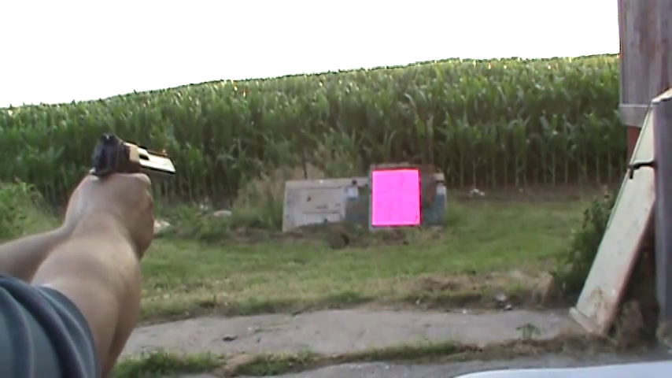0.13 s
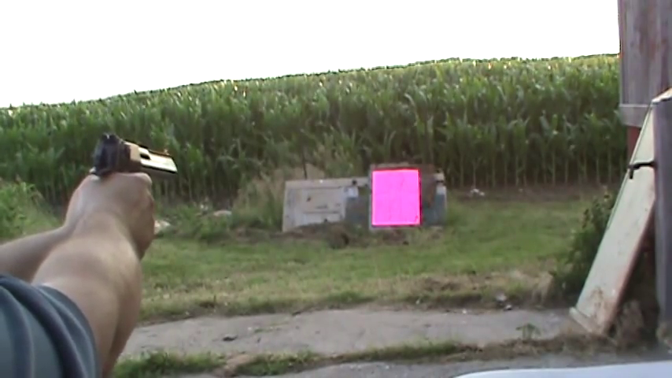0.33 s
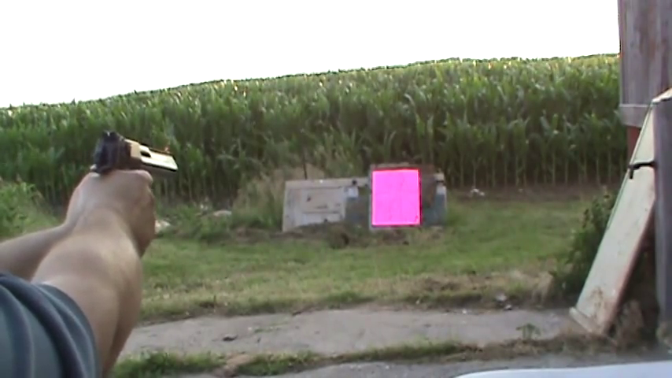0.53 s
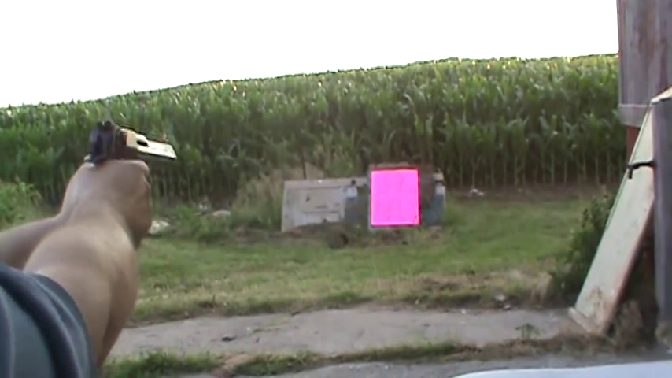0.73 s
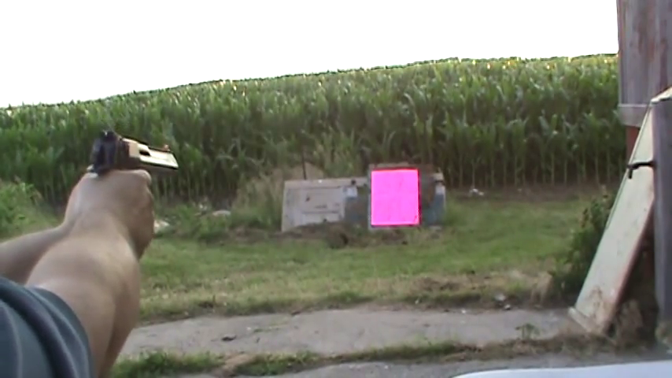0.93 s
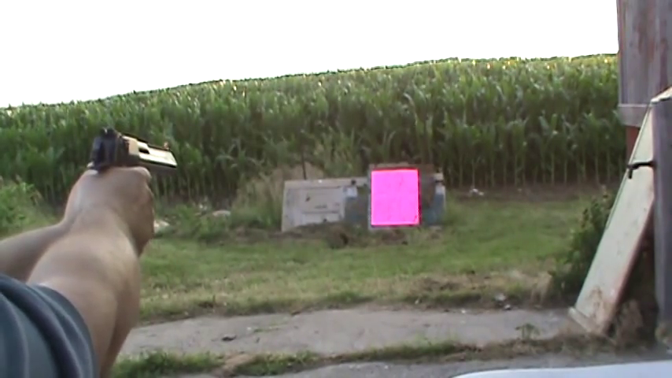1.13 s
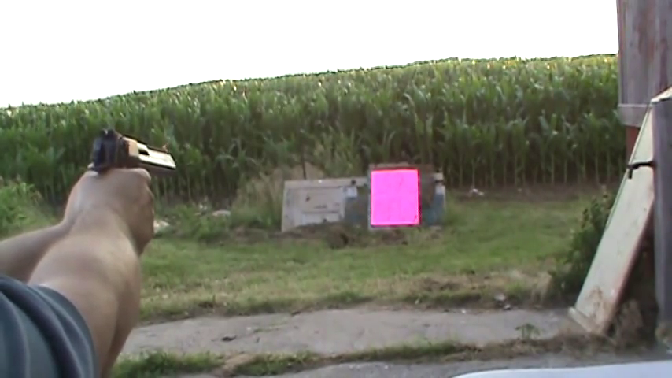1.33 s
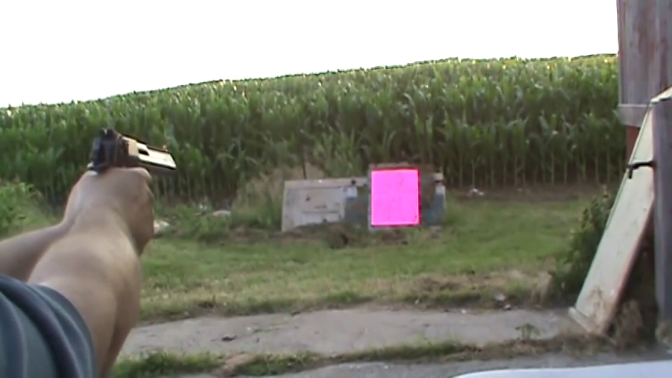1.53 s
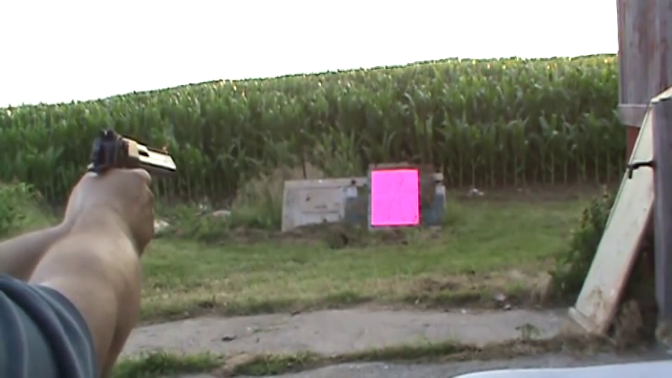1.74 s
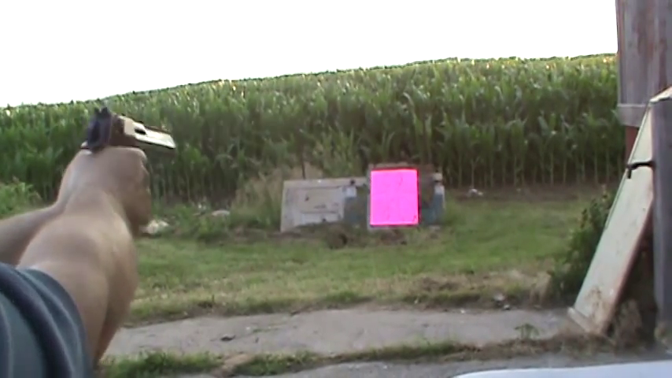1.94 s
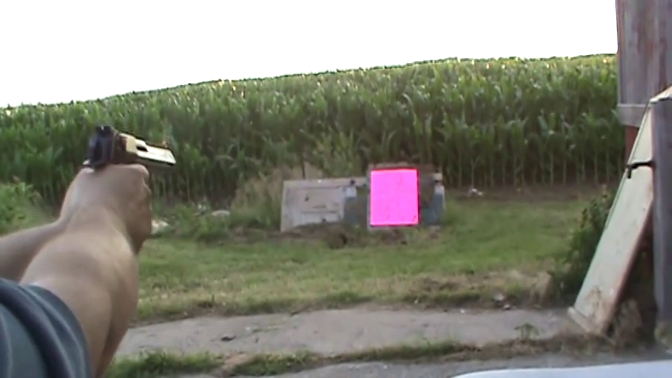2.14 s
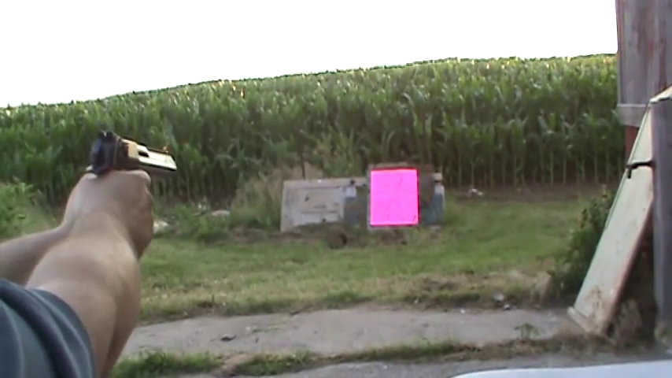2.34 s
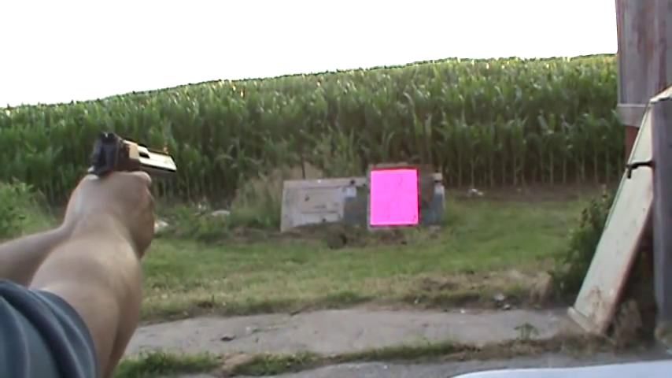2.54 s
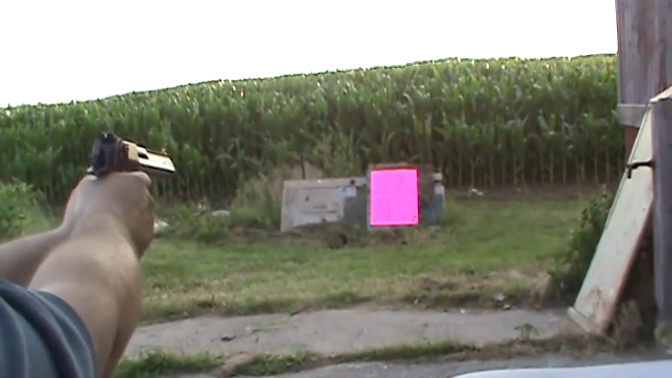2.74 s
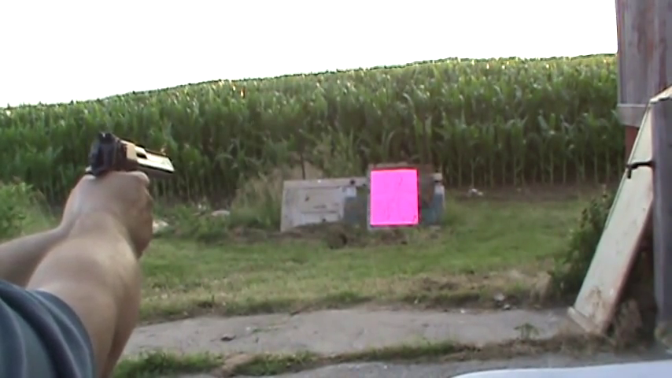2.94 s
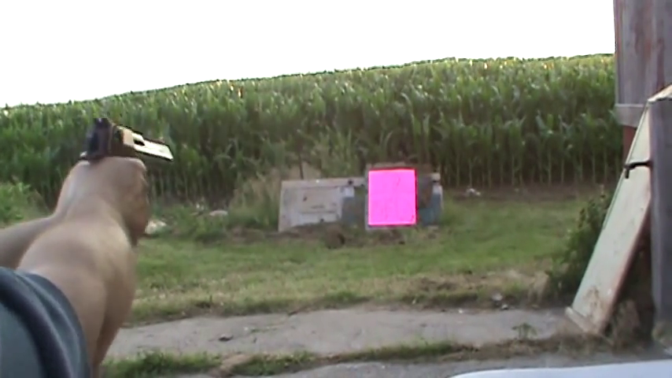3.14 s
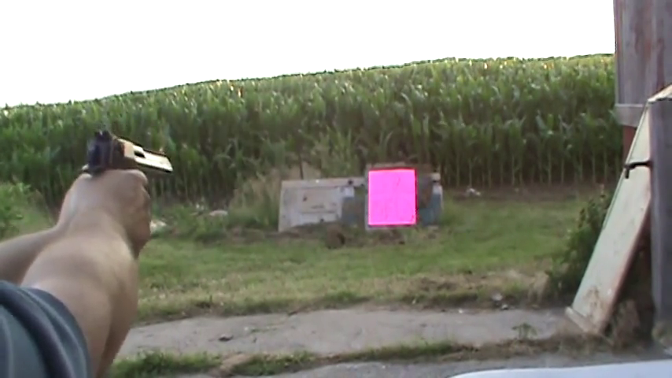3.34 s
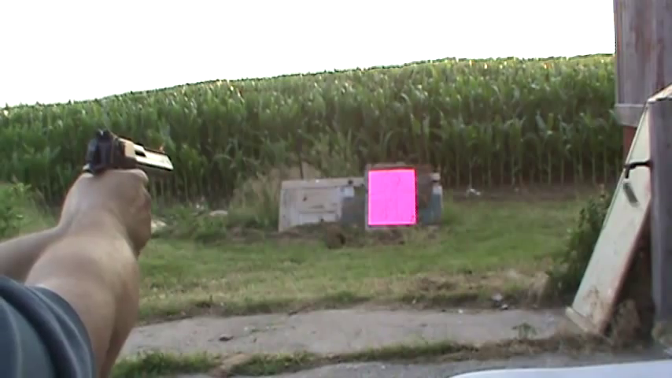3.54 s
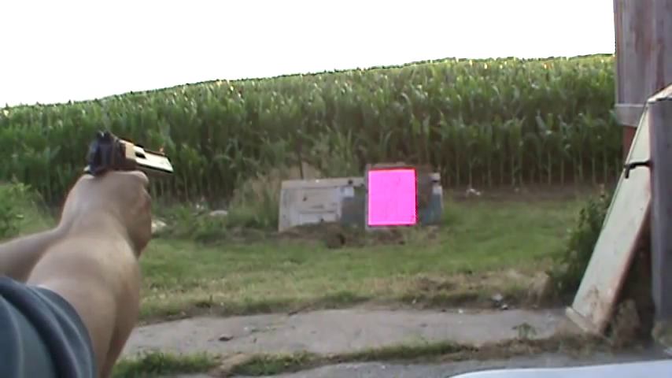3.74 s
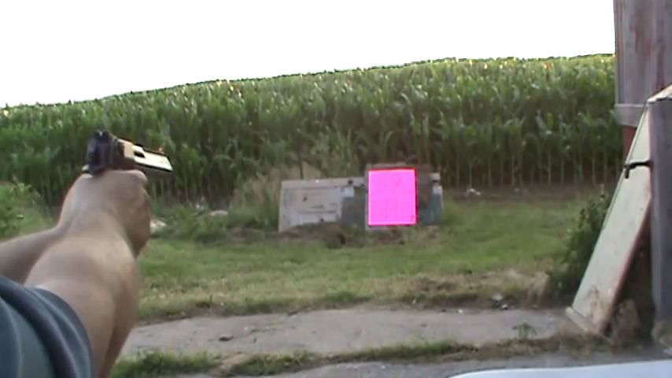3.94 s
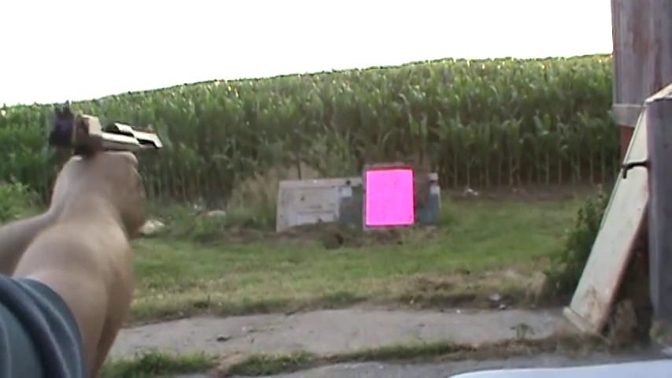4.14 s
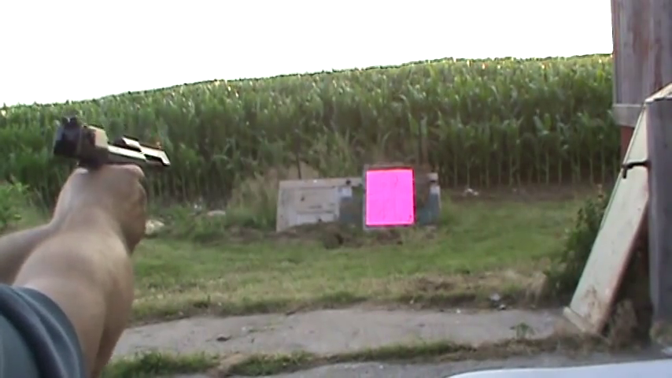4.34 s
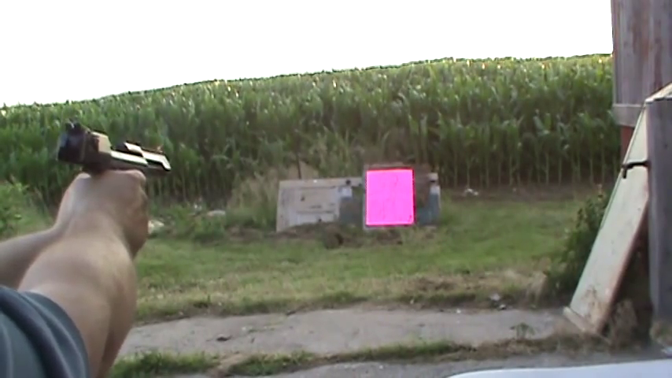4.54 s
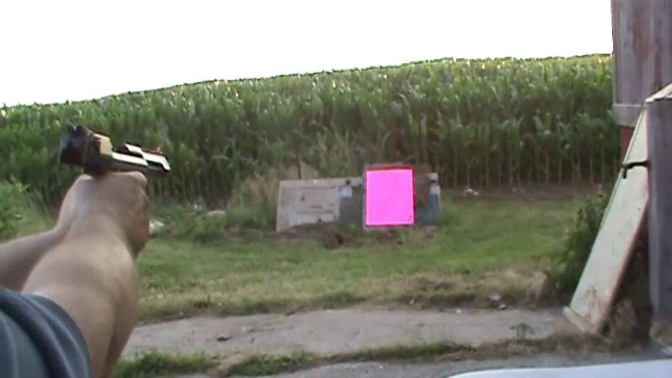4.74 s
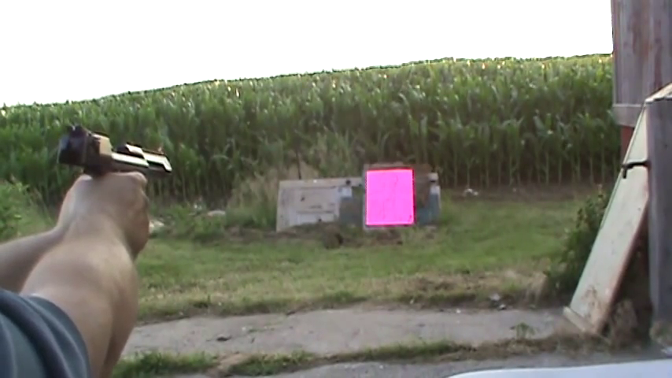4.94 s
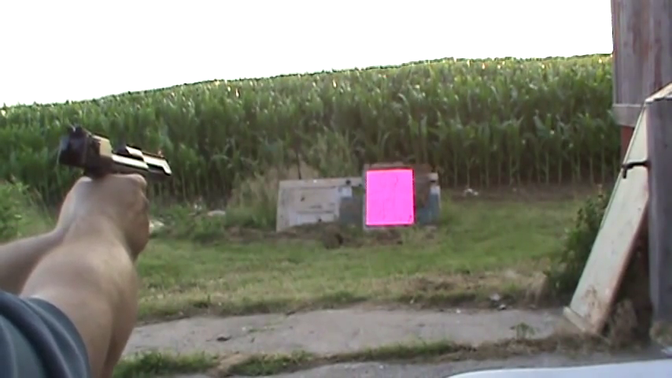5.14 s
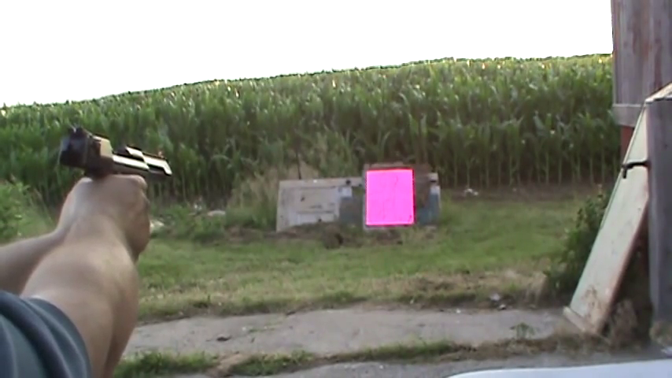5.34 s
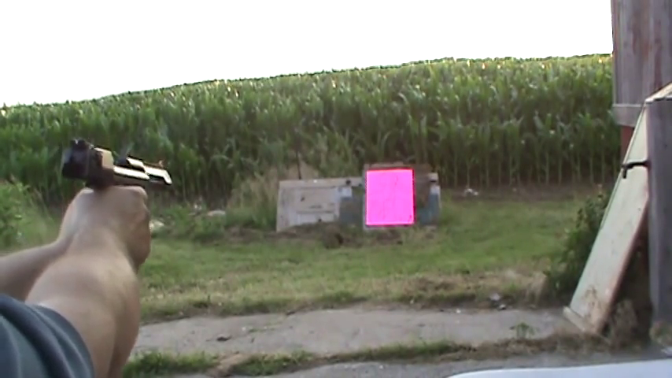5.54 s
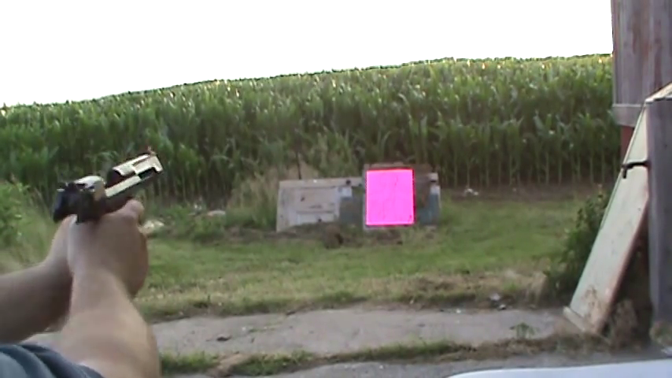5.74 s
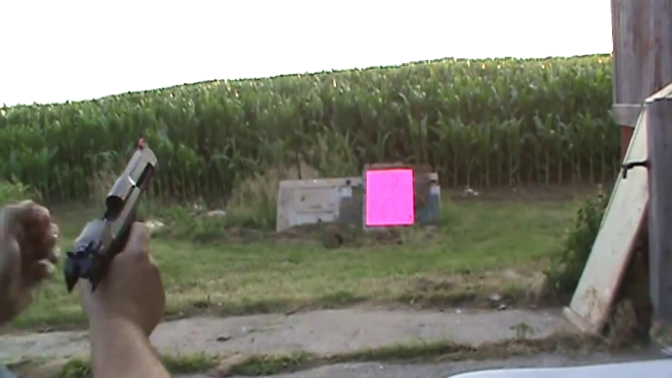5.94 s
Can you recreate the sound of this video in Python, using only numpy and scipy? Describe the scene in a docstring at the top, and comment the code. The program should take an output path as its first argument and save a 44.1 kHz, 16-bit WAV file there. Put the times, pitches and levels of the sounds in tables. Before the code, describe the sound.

At the start, the echo of an earlier shot rolls away outdoors while a spent case knocks nearby and pings on concrete. A large pistol then fires four times close to the microphone, at about 0.6, 1.8, 3.0 and 4.1 seconds. Each shot is a loud, bright, slightly overloaded crack, followed by a slap, a hollow boom from a shed and a dull echo from a field, dying away within about a second. Between shots, brass cases knock, clink and ring, with the sharpest knock near 3.7 seconds. Hands thud softly on the grip around 0.4 and 2.9 seconds. A very faint, distant tone rises and falls near 3.9 seconds. From 4.4 to 4.9 seconds a case tumbles in a quick run of knocks, slightly to the right. Light metallic pings and tiny clicks continue until about 6 seconds, over quiet, low country air.

```python
"""The echo of a shot rolls away and a spent case knocks nearby; then a large pistol fires four times.
Each muzzle blast is a burst of turbulent gas that overloads the microphone. A shed reflects it as a
slap and resonates with a boom, a maize field scatters back a dull echo, and the land reverberates.
Between shots, brass cases strike nearby things, then bounce and ring in their modes on concrete.
Hands shift on the grip, and under it all lie quiet country air and one faint, far tone."""
import sys
import numpy as np
from scipy import signal
from scipy.fft import rfft, irfft, next_fast_len
from scipy.io import wavfile
from scipy.ndimage import uniform_filter1d, map_coordinates

SR = 44100
rng = np.random.default_rng(int(sys.argv[2]) if len(sys.argv) > 2 else 0)


def unload_wav(signal):
    """Save mono or channel-first audio to the path in sys.argv[1] as 16-bit WAV at rate SR, clipped to [-1, 1]."""
    wavfile.write(
        sys.argv[1],
        SR,
        np.round(np.clip(np.atleast_2d(signal).T, -1, 1) * 32767).astype(np.int16),
    )


N = 263718
TOP_HZ = 15800  # upper band limit


def amp(db):
    """Level to amplitude ratio."""
    return 10 ** (np.asarray(db) / 20)

def unit(x):
    """Normalisation to rms 1."""
    return x / np.sqrt(np.mean(x ** 2) + 1e-20)

def along(points, hz):
    """Interpolation on a logarithmic frequency axis."""
    f, values = np.transpose(points)
    return np.interp(np.log(hz + 1), np.log(f + 1), values)

def clock(size):
    """Sample times, t/s."""
    return np.arange(size) / SR

def fade(t, t60):
    """Exponential decay from t = 0, by 60 dB in t60 seconds."""
    return 10 ** (-3 * np.maximum(t, 0) / np.maximum(t60, 1e-3))

def onset(t, rise):
    """Exponential build-up with time constant rise."""
    return 1 - np.exp(-t / rise)

def wobble(rate, size):
    """Smooth random modulation, rate knots a second."""
    return map_coordinates(rng.standard_normal(2000), [clock(size) * rate], mode="mirror")

def filtered(x, response):
    """Linear filtering: the spectrum times a frequency response."""
    size = x.shape[-1]
    padded = next_fast_len(size + SR // 8)
    return irfft(rfft(x, padded) * response(np.fft.rfftfreq(padded, 1 / SR)), padded)[..., :size]

def panned(x, db):
    """Direction by level difference, left minus right."""
    return x * amp(np.reshape([db / 2, -db / 2], (2, -1)))

# Width of diffuse sound: f/Hz, side minus mid/dB
DIFFUSE_WIDTH = [(60, -13.5), (110, -12), (200, -12), (380, -2.5), (700, -4.5), (1290, -3.5), (2380, -4),
                 (4400, -5), (8120, -0.5), (15000, -10.5)]
def noise(spectrum, size, width=DIFFUSE_WIDTH):
    """Partly coherent stereo noise of rms 1; the spectrum gives its relative density."""
    def response(hz):
        mid_db = along(spectrum, hz)
        return amp([mid_db, mid_db + along(width, hz)])
    mid, side = filtered(rng.standard_normal((2, size)), response)
    return unit(np.array([mid + side, mid - side]))

# Balance of diffuse echoes: f/Hz, left minus right/dB
DIFFUSE_LEAN = [(60, -3.5), (110, 1.5), (200, 1), (380, 0.5), (700, -3), (1290, -3.5), (2380, -0.5),
                (4400, -2), (8120, 1), (15000, -2.5)]
def echo(spectrum, decay, rise, hold, lumpy_db, patchy_db, width=DIFFUSE_WIDTH, lean=DIFFUSE_LEAN):
    """Scattering: echoes build up, last while the wave crosses the reflectors, then decay by band."""
    size = 2 * SR
    hz, t, bands = signal.stft(noise(spectrum, size, width), SR, nperseg=256)
    # single reflectors stand out, each with its own colour
    patches = uniform_filter1d(rng.standard_normal(bands.shape[1:]), size=3, axis=0)
    patches = unit(uniform_filter1d(patches, size=5, axis=1))
    bands = bands * amp(patchy_db * patches) * fade(t - hold, along(decay, hz)[:, None])
    cloud = signal.istft(bands, SR, nperseg=256)[1][:, :size]
    cloud = cloud * amp(lumpy_db * wobble(140, size)) * onset(clock(size), rise)
    return filtered(cloud, lambda hz: amp([along(lean, hz) / 2, -along(lean, hz) / 2]))

# Spectrum of the outdoor air: f/Hz, level/dB
AIR_SPECTRUM = [(15, -42.5), (25, -10), (59, 2.5), (123, 1.5), (161, -7.5), (236, 1.5), (285, -5),
                (476, -10), (1130, -6.5), (1480, -10), (2000, -9), (6050, -16.5), (7310, -22), (16000, -27)]
def country_air():
    """Ambient noise, mostly low in frequency, with slow amplitude modulation."""
    level = amp(-58 + 0.53 * wobble(0.86, N))
    return level * noise(AIR_SPECTRUM, N, width=[(30, -5.5), (120, -25), (500, -7), (8000, -6.5)])

def far_tone(crest_s=3.88, half_s=.19, crest_hz=760, sag_hz_per_s2=5200):
    """A parabolic glide: a faint, blurred tone falls in pitch and level either side of its crest."""
    t = clock(N) - crest_s
    hz = crest_hz - sag_hz_per_s2 * np.minimum(np.abs(t), half_s) ** 2
    arch = np.sqrt(np.maximum(1 - (t / half_s) ** 2, 0))
    level = amp(-55.5 + 1.3 * wobble(35, N)) * arch
    return level * np.sin(2 * np.pi * np.cumsum(hz) / SR + .9 * wobble(66, N))

# Spectrum of reflections from shed and yard: f/Hz, level/dB
YARD_SPECTRUM = [(100, -9), (400, -5), (1000, 2), (2000, -3), (3500, -5.5), (5500, -5.5), (8000, -15),
                 (12000, -19.5), (16000, -31.5)]
def shed_echo(sound):
    """Convolution with the wall's impulse response gives small sounds a faint echo."""
    wall = echo(YARD_SPECTRUM, [(300, 0.23), (8000, 0.14)],
                rise=0.0055, hold=0.0089, lumpy_db=4, patchy_db=2)
    return amp(-18.5) * signal.fftconvolve(sound, wall / np.linalg.norm(wall[0]), axes=1)[:, :N]

# Spectra of a soft and of a hard, dry contact: f/Hz, level/dB
THUD_SPECTRUM = [(80, -11), (200, -4), (400, -2), (900, -3), (2000, -14.5), (6000, -26), (15000, -51.5)]
CLICK_SPECTRUM = [(200, -7), (1000, -1), (2200, 1), (3200, 2.5), (5200, -0.5), (7000, -5.5), (10000, -10.5),
                  (16000, -23.5)]
# Hand movements: t/s, level/dB, relative click level/dB
HAND_MOVES = [(0.354, -26.5, -23), (0.567, -30, -25.5), (2.891, -24, -21), (2.979, -43, 3),
              (5.3615, -49, 13), (5.6342, -53, 12.5)]
def grip():
    """Damped impacts: hands thud on the grip, and the trigger or action clicks."""
    out, t = np.zeros((2, N)), clock(SR // 3)
    for s, db, click_db in HAND_MOVES:
        thud = amp(-4.5) * noise(THUD_SPECTRUM, len(t)) * fade(t, 0.035)
        click = amp(click_db) * noise(CLICK_SPECTRUM, len(t)) * fade(t, 0.02)
        add(out, s, amp(db) * (thud + click))
    return out

def add(track, s, sound):
    """Superposition of a sound on the track, starting at s seconds."""
    start = round(s * SR)
    part = sound[:, max(-start, 0):N - start]
    track[:, max(start, 0):][:, :part.shape[1]] += part

def resonance(t, hz, t60, rough):
    """One damped mode, with phase jitter of about rough radians."""
    return np.sin(2 * np.pi * hz * t + rough * wobble(450, len(t))) * fade(t, t60)

def faint_contacts(count):
    """A random process of tiny impacts: t/s, level/dB, f/Hz."""
    when, level, pitch = rng.random((count, 3)).T
    return list(zip(when * N / SR, -52 + 5 * level, 1910 * 2 ** (pitch - .5)))

# Contacts a little way off: t/s, level/dB, f/Hz
FAR_CONTACTS = [(0.8493, -19.5, 1601), (0.8892, -20.5, 2140), (0.925, -27, 1636), (2.0877, -27.5, 2980),
                (2.136, -32, 2760), (2.3068, -36, 3130), (2.538, -37, 2730), (3.2585, -24.5, 2940),
                (3.3784, -28.5, 2390), (5.329, -49, 1890), (5.926, -42.5, 1613)]
def clinks():
    """Damping rises with frequency, so low clinks ring longest; distance softens their attack."""
    out, t = np.zeros((2, N)), clock(SR // 3)
    for s, db, hz in FAR_CONTACTS + faint_contacts(count=16):
        t60 = 0.072 * (2900 / hz) ** 1.6
        white = rng.standard_normal((2, len(t)))
        clatter = unit(filtered(white, lambda f: 1 / (1 + (6 * (f / hz - 1)) ** 2)))
        clink = amp(-6) * resonance(t, hz, t60, rough=0.47) + amp(-5) * clatter * fade(t, t60)
        add(out, s, amp(db) * clink * onset(t, 0.00099))
    return out

# Modes of a case before scaling to its pitch, main mode first: f/Hz, level/dB, T60/s
CASE_MODES = [(6300, -0.5, 0.21), (6210, -6, .18), (2870, -10.5, 0.026), (12590, -37, .09),
              (15420, -27, .1), (15560, -10, .12)]
def case_ring(t, pitch_hz, spin_hz, depth, rough):
    """Directional radiation: a tumbling case turns its ring toward and away from the listener."""
    stretch = pitch_hz / CASE_MODES[0][0]
    ring = 0
    for hz, db, t60 in CASE_MODES:
        jitter = rough * np.array([wobble(260, len(t)), wobble(260, len(t))])
        ring += amp(db) * fade(t, t60) * np.sin(2 * np.pi * hz * stretch * t + jitter)
    tumble = 1 + depth * np.sin(2 * np.pi * spin_hz * rng.uniform(.85, 1.15) * t)
    return ring * tumble * onset(t, 0.00056)

# Spectrum of brass striking concrete: f/Hz, level/dB
TICK_SPECTRUM = [(200, -8.5), (1000, -3.5), (2200, -6.5), (3100, 3.5), (4200, -8.5), (6000, -3.5),
                 (9000, -13.5), (12000, -18), (16000, -27)]
# Landings: t/s, tick level/dB, ring level/dB, ring f/Hz, ping level/dB
LANDINGS = [(0.3008, -21, -29, 6330, -31.5), (0.4497, -32, -43, 6270, -45),
            (1.497, -23.5, -35, 6230, -32.5), (2.1654, -32, -35, 6290, -47), (2.5726, -35, -45, 6160, -55),
            (2.5994, -25.5, -38.5, 6240, -54), (4.5675, -40, -40, 6440, -43), (4.9399, -27, -28, 6300, -58),
            (5.488, -27, -37, 6330, -31), (5.7648, -36, -40, 6400, -45), (5.9173, -34, -58, 6445, -37.5)]
def cases_on_concrete():
    """Impact excitation: a case ticks, skitters and rings freely, with a lower, shorter ping."""
    out, t = np.zeros((2, N)), clock(SR // 3)
    for s, db, ring_db, hz, ping_db in LANDINGS:
        tick = amp(-6.5) * fade(t, 0.0032)
        skitter = amp(-16.5) * fade(t - .014, 0.032) * amp(3.8 * wobble(340, len(t)))
        ring = amp(ring_db) * case_ring(t, hz, spin_hz=33.94, depth=0.4, rough=0.64)
        ping = amp(ping_db) * resonance(t, hz=3160, t60=0.097, rough=.7)
        contact = amp(db) * (tick + skitter) * noise(TICK_SPECTRUM, len(t))
        add(out, s, panned(contact + ring + ping, -2))
    return out

# Spectrum of a struck object shaking: f/Hz, level/dB
RATTLE_SPECTRUM = [(150, -10), (400, -6), (700, 0.5), (1300, -2), (2200, -3), (3500, -10), (6500, -5),
                   (9000, -13), (15000, -18)]
def knock(db, hz):
    """Contact stiffness: a harder spot resonates higher, clicks more and rattles less."""
    t = clock(SR // 3)
    hardness = np.log2(hz / 1780)  # octaves above a middling spot
    click = amp(-6 + 2 * hardness) * noise(CLICK_SPECTRUM, len(t)) * fade(t - .001, 0.01)
    body = amp(-4) * resonance(t, hz, t60=34 / hz, rough=1.0)
    rattle = amp(-19.5 - 13 * hardness) * noise(RATTLE_SPECTRUM, len(t))
    rattle *= fade(t - .013, 0.078) * onset(t, 0.0047)
    # a softer spot dulls the blow and muffles the ring of the case
    lowpass = signal.butter(2, min(3.1 * hz, TOP_HZ), fs=SR, output="sos")
    blow = signal.sosfilt(lowpass, click + body + rattle)
    ring_db = -33 + 0.73 * db + 19 * min(hardness, 0)
    ring = amp(ring_db) * case_ring(t, pitch_hz=6390, spin_hz=24, depth=0.17, rough=0.65)
    return panned(amp(db) * blow + ring, -5)

# Cases hitting nearby things: t/s, level/dB, f/Hz of the spot, flip time/s (0 = lands flat)
CASE_STRIKES = [(0.127, -12.5, 3020, 0.00028), (1.1984, -14.5, 1110, 0.00091), (1.294, -32.5, 1280, 0.0043),
                (3.658, -5.5, 1870, 0.0041), (3.7848, -33, 985, 0.0095), (4.3935, -18, 2960, 0.00033),
                (4.4593, -17, 1906, 0.01), (4.556, -21.5, 1987, 0.01), (4.6174, -28.5, 1900, .02),
                (4.7362, -19, 1776, 0), (4.7466, -25.5, 3360, .0215), (4.8204, -25, 1713, 0.00033),
                (4.8732, -29, 1770, 0.049)]
def case_knocks():
    """Double impact: a case tumbling off to the right hits with one end, then softly with the other."""
    out = np.zeros((2, N))
    for s, db, hz, flip_s in CASE_STRIKES:
        add(out, s, knock(db, hz))
        if flip_s > 0:
            add(out, s + flip_s, knock(db - 5, hz))
    return out

# Air modes of the shed: f/Hz, level/dB
SHED_MODES = [(161, -16), (228, 3), (290, -21.5), (379, -4), (472, -16)]
def shed_boom(rise, hold, t60, drift):
    """Cavity resonance: the shed's air sounds hollowly while echoes feed it, then decays."""
    t = clock(2 * SR)
    modes = sum(amp(db) * np.sin(2 * np.pi * (hz * t + rng.random()) + drift * wobble(31, len(t)))
                for hz, db in SHED_MODES)
    return modes * onset(t, rise) * fade(t - hold, t60)

# Spectra returned by the maize field and the land: f/Hz, level/dB
FIELD_SPECTRUM = [(30, -34.5), (80, -20.5), (120, -6.5), (165, 3), (250, 6), (400, 1.5), (520, 1.5),
                  (700, 2.5), (1050, -2.5), (1400, -23), (3000, -21.5), (7000, -34.5), (15000, -60.5)]
LAND_SPECTRUM = [(30, -14), (80, -7), (140, 4), (220, 0.5), (400, -5.5), (1000, -8), (3000, -18),
                 (6000, -19.5), (9000, -36), (15000, -46)]
# Reverberation times of yard and field: f/Hz, T60/s
YARD_T60 = [(200, 0.39), (1500, 0.66), (4000, 0.46), (7000, 0.39), (11000, 0.34), (15500, 0.4)]
FIELD_T60 = [(50, 0.66), (200, 0.82), (800, 0.48), (3000, 1), (10000, 0.93)]
def surroundings():
    """The impulse response of the place: the same for every shot, as the shooter stands still."""
    yard = echo(YARD_SPECTRUM, YARD_T60, rise=0.0027, hold=0.016, lumpy_db=1.1, patchy_db=2)
    field = echo(FIELD_SPECTRUM, FIELD_T60, rise=0.054, hold=0.2, lumpy_db=1.1, patchy_db=0.86)
    land = echo(LAND_SPECTRUM, [(200, 1.93), (4000, 1.2)],
                rise=0.076, hold=0.26, lumpy_db=1.1, patchy_db=3)
    boom = shed_boom(rise=0.042, hold=0.24, t60=.6, drift=0.39)
    return amp(-9.5) * yard + amp(-14.5) * field + amp(-36) * land + amp(-22) * boom

# Spectra of the muzzle crack, the slap off ground and wall, and a wall's hard return: f/Hz, level/dB
CRACK_SPECTRUM = [(30, -9), (200, -7.5), (1000, -4), (2800, 4.5), (6000, -4), (10000, -7), (16000, -10.5)]
SLAP_SPECTRUM = [(30, -27), (70, -20.5), (150, -4), (230, -5.5), (320, 2.5), (500, 2), (700, -10.5),
                 (1100, -1.5), (1700, -13), (5000, -20.5), (15000, -34)]
PUNCH_SPECTRUM = [(60, -22), (200, -12), (320, -4.5), (480, -1.5), (650, -12), (1300, -12), (3000, -32.5),
                  (15000, -46.5)]
# Stereo image of the early sound: f/Hz, side minus mid/dB; and f/Hz, left minus right/dB
EARLY_WIDTH = [(60, -1), (110, -1.5), (200, -9), (380, -8.5), (700, 0), (1290, -4), (2380, -3), (4400, -5),
               (8120, 0.5), (15000, -7.5)]
EARLY_LEAN = [(60, 5), (110, -2.5), (200, -3), (380, 0.5), (700, -7.5), (1290, 0.5), (2380, -4.5),
              (4400, -5), (8120, -3.5), (15000, -0.5)]
# Shots, the first heard only by its echo: t/s, level/dB, relative crack level/dB
BLASTS = [(-.56, 2.5, 0), (0.5979, 0.5, -2.5), (1.8422, 0, -2), (3.013, 0, -1), (4.0678, -0.5, 0)]
def pistol():
    """A blast wave arrives as a bright direct crack, heavy early reflections and reverberation."""
    out, t = np.zeros((2, N)), clock(2 * SR)
    punch = amp(-11) * echo(PUNCH_SPECTRUM, [(200, .05), (4000, 0.026)], rise=.003, hold=0.021,
                            lumpy_db=-4, patchy_db=2.5, width=EARLY_WIDTH, lean=EARLY_LEAN)
    reverberation = surroundings()
    crack_envelope = fade(t - .005, 0.03) + amp(-11) * fade(t, 0.12)
    for s, db, crack_db in BLASTS:
        # the turbulent gas, and with it the nearest slap, is new for every shot
        slap = amp(-7) * echo(SLAP_SPECTRUM, [(200, 0.13), (4000, .06)], rise=0.0046, hold=0.027,
                              lumpy_db=0.9, patchy_db=1.5, width=EARLY_WIDTH, lean=EARLY_LEAN)
        crack = amp(crack_db - 8.5) * noise(CRACK_SPECTRUM, len(t), EARLY_WIDTH) * crack_envelope
        add(out, s, amp(db) * (panned(crack, -1.1) + reverberation))
        add(out, s + .006, amp(db) * slap)
        add(out, s + .028, amp(db) * punch)
    return out

def scene():
    """Linear superposition of the small contacts, their echo, the background and the shots."""
    contacts = case_knocks() + cases_on_concrete() + clinks() + grip()
    return contacts + shed_echo(contacts) + country_air() + pistol() + far_tone()

def record(dry):
    """Saturation: the microphone's amplifier flattens the peaks; a steep low-pass limits the band."""
    ceiling, hardness = .95, 7
    clipped = dry / (1 + np.abs(dry / ceiling) ** hardness) ** (1 / hardness)
    return filtered(clipped, lambda hz: 1 / np.sqrt(1 + (hz / TOP_HZ) ** 160))


dry = scene()
out = record(dry)
unload_wav(out)
```